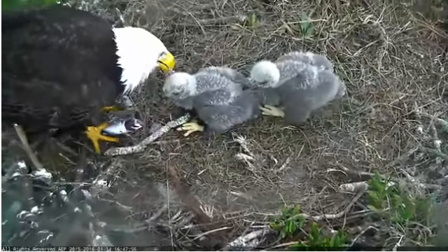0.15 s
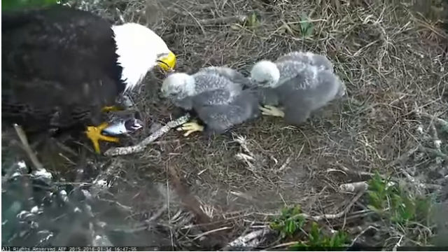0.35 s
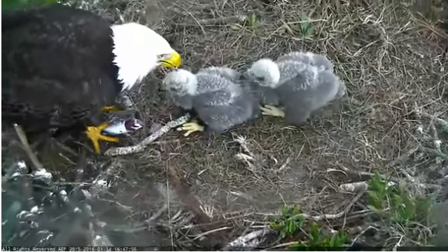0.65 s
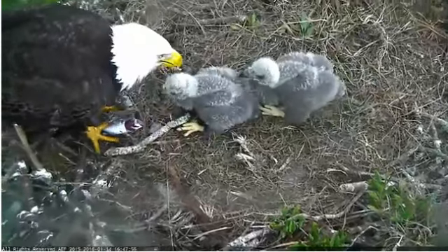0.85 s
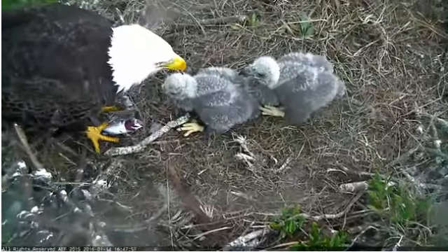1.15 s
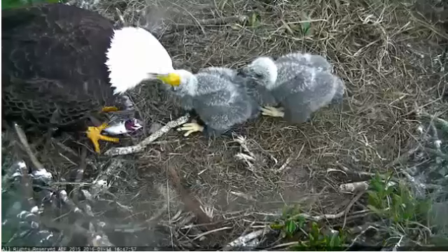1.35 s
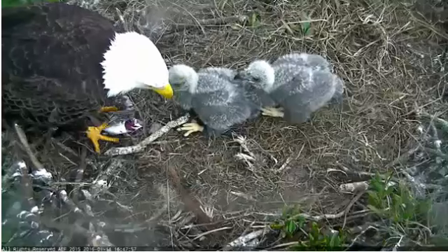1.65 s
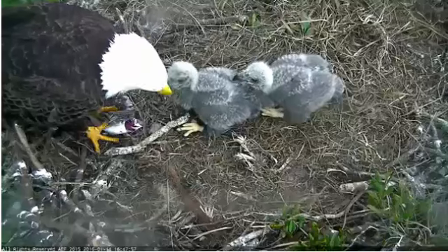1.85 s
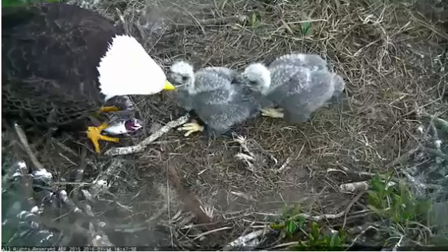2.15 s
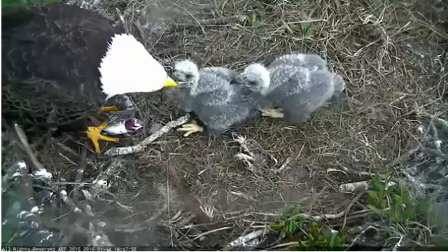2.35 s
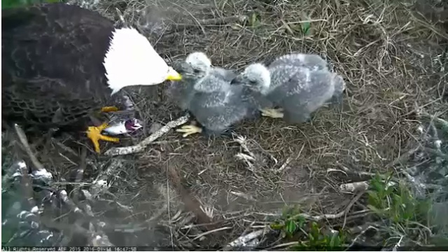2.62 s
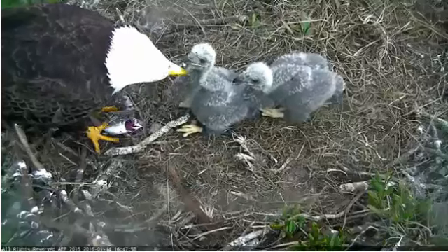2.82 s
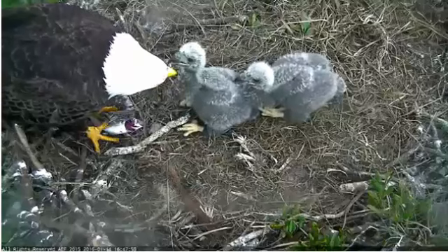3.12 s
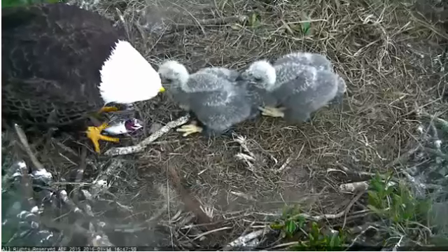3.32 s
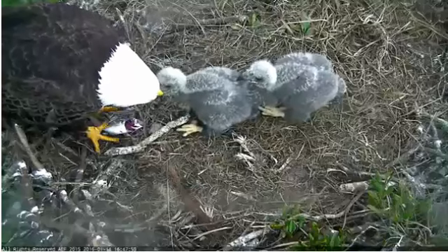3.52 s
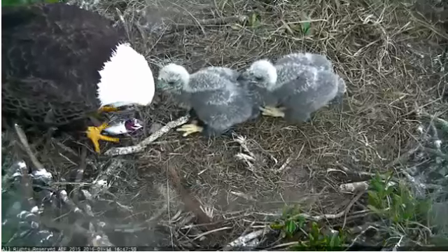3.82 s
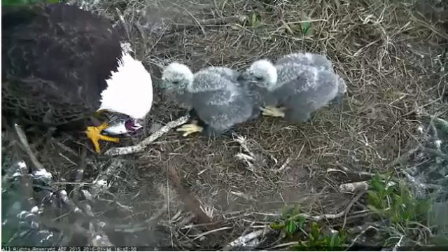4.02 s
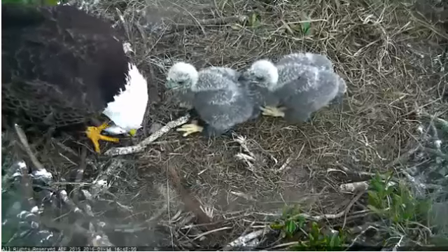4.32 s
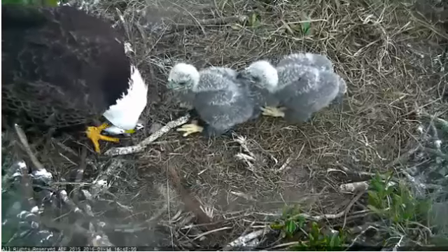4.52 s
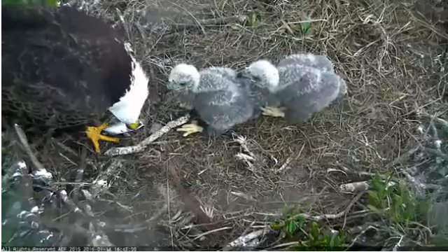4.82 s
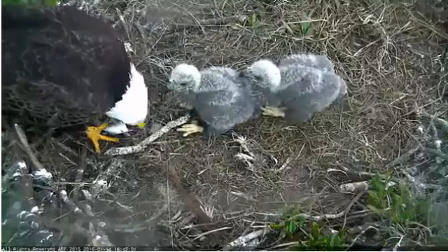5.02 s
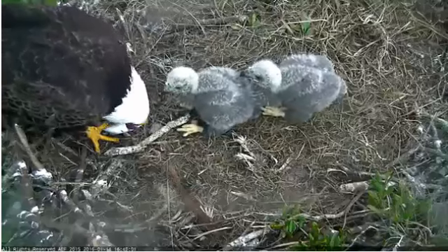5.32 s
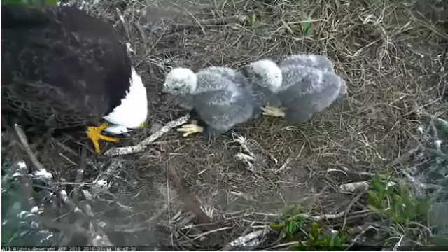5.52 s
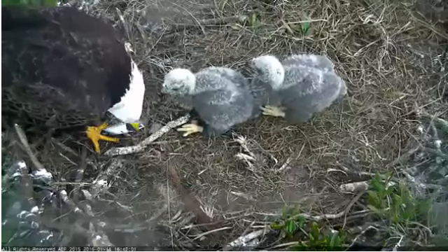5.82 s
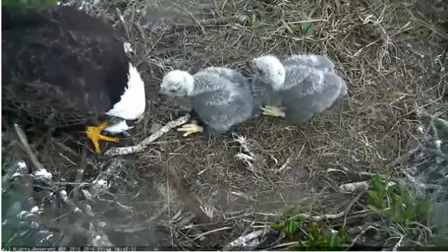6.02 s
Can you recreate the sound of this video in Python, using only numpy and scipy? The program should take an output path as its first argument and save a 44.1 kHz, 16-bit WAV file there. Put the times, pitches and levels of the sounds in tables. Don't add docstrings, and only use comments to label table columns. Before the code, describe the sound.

Close above an outdoor stick nest, one microphone picks up steady hiss, distant wind and traffic, low soft buffets and a thin electronic whine. Eaglets give faint, very short high peeps, singly and in small clusters. Past the middle, dry twig ticks and light straw drags join as the parent tears at food. At the very end a hard tug snaps twigs in a much louder crackle with a low thump.

```python
import sys
import numpy as np
from scipy import signal
from scipy.io import wavfile
from scipy.ndimage import uniform_filter1d

SR = 44100
rng = np.random.default_rng(int(sys.argv[2]) if len(sys.argv) > 2 else 0)


def decibels_to_gain(level_db):
    exponent = np.asarray(level_db, float) / 20
    return 10 ** exponent


def wav_record(signal):
    frames = np.transpose(np.atleast_2d(signal))
    bounded = np.clip(frames, -1, 1)
    quanta = np.round(bounded * 32767).astype(np.int16)
    wavfile.write(sys.argv[1], SR, quanta)


N = 271732

# frequency_hz, density_db_per_hz
AIR_SPECTRUM = [(78, -81.5), (135, -101), (215, -92), (1000, -97.5), (2100, -102), (2840, -100.5),
                (4500, -106.5), (11000, -115)]
# time_s, level_db
AIR_SWELL = [(0.1, -62), (0.67, -60.5), (0.94, -64), (1.51, -62), (1.76, -63.5), (2.33, -62.5), (2.7, -64),
             (4.54, -63.5), (6.0, -63)]
# start_s, hold_s, level_db
GUSTS = [(.54, 0.078, -60), (.81, 0.0048, -63), (1.13, .02, -66), (1.28, 0.12, -63.5), (1.7, 0.13, -66),
         (2.12, .03, -60.5), (2.52, 0.13, -71), (2.98, 0.023, -63.5), (3.19, .01, -67), (3.3, 0.06, -65),
         (3.53, 0.18, -69.5), (3.85, 0.011, -64), (4.12, 0.15, -60), (4.39, .02, -59.5), (4.59, .01, -78),
         (4.76, 0.089, -57.5), (5.1, 0.64, -83), (5.79, 0.034, -61.5)]
# pitch_hz, level_db (rms)
WHINE_LINES = [(2640, -89), (2735, -87), (2828.5, -77), (2923, -84), (3017, -88)]
# frequency_hz, density_db_per_hz
HISS_SPECTRUM = [(30, -81), (200, -108), (1000, -109.5), (4500, -110), (7000, -109), (11000, -111)]
AMPLIFIER_OFFSET = [
    [-.10014],
    [-.05794],
]
# start_s, length_s, first_pitch_hz, last_pitch_hz, peak_level_db
PEEPS = [(0.039, 0.023, 3400, 2750, -56.5), (0.371, 0.038, 3470, 2610, -54.5),
         (0.73, 0.019, 2980, 3420, -62), (0.745, 0.015, 3590, 3530, -58), (0.759, 0.018, 3440, 2780, -63),
         (1.164, 0.035, 3500, 4280, -64), (1.518, 0.017, 4100, 4450, -60), (2.282, 0.022, 3350, 2660, -63),
         (2.413, 0.013, 3980, 3050, -52), (2.428, 0.011, 3520, 4350, -63), (2.62, 0.018, 3400, 3300, -58),
         (2.638, 0.023, 3400, 2650, -60.5), (2.903, 0.02, 3830, 3980, -59), (2.93, 0.026, 3450, 2680, -56),
         (2.96, 0.011, 2850, 3250, -69), (2.976, 0.024, 3520, 2730, -55), (3.235, 0.012, 3640, 4450, -53),
         (3.288, 0.0224, 3360, 2630, -59), (3.945, 0.025, 3690, 3000, -66), (4.134, 0.031, 3770, 3610, -54),
         (4.282, 0.036, 3390, 2810, -63), (4.364, 0.029, 3005, 3910, -57), (4.718, 0.028, 3200, 2580, -65),
         (5.487, 0.051, 3010, 3850, -57.5)]
# start_s, low_ring_level_db, low_ring_pitch_hz, high_ring_level_db
TICKS = [(3.3502, -56, 2950, -67.2), (3.3964, -54.5, 3050, -63.3), (3.6251, -54, 2560, -54),
         (4.0068, -56, 3010, -68), (4.187, -52, 2420, -57), (4.2315, -62.4, 2840, -71),
         (4.2713, -67, 1960, -60), (4.318, -55, 2930, -69.7), (4.3584, -56, 3120, -68),
         (4.3662, -54, 2660, -64), (4.3717, -51, 3350, -58), (4.3784, -57, 2450, -63),
         (4.3882, -57, 2950, -57), (4.3953, -57, 2780, -55), (4.4047, -65, 2710, -62),
         (4.4474, -54, 2740, -63), (4.4548, -69, 3150, -62), (4.6325, -59, 2880, -72),
         (4.704, -65, 2800, -60), (4.7204, -61.9, 3140, -54.5), (4.8974, -53, 2650, -60),
         (4.9528, -51, 3020, -52), (5.0461, -59, 2650, -53.5), (5.5047, -53, 2630, -69)]
# start_s, low_ring_level_db, low_ring_pitch_hz, high_ring_level_db
TUG_SNAPS = [(6.061, -59, 2650, -63), (6.0648, -42, 2740, -45), (6.0655, -56, 2830, -46),
             (6.0744, -45, 2860, -54), (6.0805, -58, 2730, -68), (6.0874, -54, 2980, -48),
             (6.0919, -45, 2890, -47), (6.101, -51, 3240, -52), (6.108, -44, 2950, -48),
             (6.1125, -47, 2600, -55), (6.1165, -48, 1810, -54), (6.1215, -50, 2880, -57),
             (6.128, -53, 2860, -67), (6.133, -52, 2820, -61), (6.1453, -60.1, 2750, -65)]
# start_s, hold_s, level_db
STRAW_DRAGS = [
    (3.4, .01, -86),
    (3.62, .01, -70),
    (4.2, .05, -76),
    (4.365, 0.036, -71),
    (4.7, 0.019, -76),
    (4.95, 0.16, -75),
]
# start_s, hold_s, level_db
STRAW_TUG = [
    (6.066, 0.047, -59.5),
]
# start_s, hold_s, level_db
NEST_SHAKE = [
    (6.09, 0.021, -53),
]
# frequency_hz, common_share, difference_share
DROPOUTS = [(150, 0, .75), (1000, 0, .6), (2500, 0, .62), (4200, 0, .03), (8000, .2, .03), (9500, .55, .12),
            (10900, .85, .35)]
# time_s, lost_share
TREBLE_LOSS = [(6.058, 0), (6.062, 1), (6.083, 1), (6.086, 0)]


def evened(x):
    return x / np.sqrt(np.mean(x ** 2) + 1e-20)


def curve(rows):
    return np.interp(np.arange(N) / SR, *np.transpose(rows))


def add(mix, start_s, sound):
    part = mix[round(start_s * SR):][:len(sound)]
    part += sound[:len(part)]


def band(x, low_hz, high_hz):
    return signal.sosfilt(signal.butter(3, [low_hz, high_hz], "band", fs=SR, output="sos"), x)


def bursts(rows, rise_db_s, fall_db_s):
    start, hold, db = np.transpose(rows)[:, :, None]
    t = np.arange(N) / SR
    rise = rise_db_s * np.maximum(start - t, 0)
    fall = fall_db_s * np.maximum(t - start - hold, 0)
    return (db - rise - fall).max(axis=0)


def noise(points, patchy_db):
    frames, hz = N // 256 + 5, np.fft.rfftfreq(1024, 1 / SR)
    real, imaginary, patches = rng.standard_normal((frames, 513, 3)).T
    grains = real + 1j * imaginary
    patches = uniform_filter1d(patches, size=12, axis=0)
    patches = evened(uniform_filter1d(patches, size=14, axis=1))
    point_hz, point_db = np.transpose(points)
    level_db = np.interp(np.log(hz + 1), np.log(point_hz), point_db)[:, None]
    white = signal.istft(grains, nperseg=1024, noverlap=768)[1].std()
    shaped = signal.istft(grains * decibels_to_gain(level_db + patchy_db * patches), nperseg=1024, noverlap=768)[1]
    return shaped[:N] * np.sqrt(SR / 2) / white


def air():
    swell_db = curve(AIR_SWELL)
    far = noise(AIR_SPECTRUM, patchy_db=0.77) * decibels_to_gain(0.39 * (swell_db - swell_db.mean()))
    gust_db = np.maximum(bursts(GUSTS, rise_db_s=194, fall_db_s=285), -106)
    return far + evened(band(rng.standard_normal(N), 82.4, 179.0)) * decibels_to_gain(gust_db - 3.5)


def whine():
    t, out = np.arange(N) / SR, np.zeros(N)
    for hz, db in WHINE_LINES:
        strength, slip = uniform_filter1d(rng.standard_normal((2, N)), size=1200, axis=1)
        out += decibels_to_gain(db + 2 + 3 * evened(strength)) * np.sin(2 * np.pi * hz * t + evened(slip))
    return out


def hiss():
    return np.array([noise(HISS_SPECTRUM, patchy_db=.3), noise(HISS_SPECTRUM, patchy_db=.3)])


def peep(length_s, first_hz, last_hz, db, wobble):
    u = np.linspace(0, 1, round(length_s * SR))
    lag = 0.153
    hz = first_hz + (last_hz - first_hz) * (u - lag * 4 * u * (1 - u))
    flutter_db = 0.52 * np.interp(u, np.linspace(0, 1, len(wobble)), wobble)
    pitch_db = -5 * ((hz - 3200) / 1000) ** 2
    swell = np.sin(np.pi * u) ** .55
    return decibels_to_gain(db + flutter_db + pitch_db) * swell * np.sin(2 * np.pi * np.cumsum(hz) / SR)


def chicks():
    out = np.zeros(N)
    for (start_s, *row), wobble in zip(PEEPS, rng.standard_normal((len(PEEPS), 8))):
        add(out, start_s, peep(*row, wobble))
    add(out, .00281, decibels_to_gain(-4.5) * out.copy())
    t = np.arange(3000) / SR
    smear = evened(rng.standard_normal(len(t)) * decibels_to_gain(-60 * t / 0.14)) / np.sqrt(len(t))
    return decibels_to_gain(-2.5) * (out + decibels_to_gain(-11) * signal.oaconvolve(out, smear)[:N])


def twigs():
    out, t = np.zeros(N), np.arange(1500) / SR
    snap = band(1. * (np.arange(len(t)) == 10), 2000, 4600)
    snap /= snap.max()
    decay_and_attack = decibels_to_gain(6.5 - 60 * t / 0.0094) * (1 - np.exp(-t / 0.00032))
    rows = TICKS + TUG_SNAPS
    for (start_s, low_db, low_hz, high_db), grit in zip(rows, rng.standard_normal((len(rows), len(t)))):
        high_hz = 3615 + 280 * np.tanh(grit[0])
        ring = decibels_to_gain(low_db) * np.sin(2 * np.pi * low_hz * t)
        ring += decibels_to_gain(high_db) * np.sin(2 * np.pi * high_hz * t)
        ring += decibels_to_gain(high_db - 17) * evened(band(grit, 1800, 9000))
        add(out, start_s, ring * decay_and_attack)
        add(out, start_s, decibels_to_gain(high_db + 3.5) * snap)
    return out


def straw():
    crackle = rng.standard_normal(N) * decibels_to_gain(2.2 * rng.exponential(1, N))
    crackle *= rng.random(N) < 2500 / SR
    drag = decibels_to_gain(bursts(STRAW_DRAGS, rise_db_s=202, fall_db_s=234))
    tug = decibels_to_gain(bursts(STRAW_TUG, rise_db_s=2400, fall_db_s=400))
    rustle = evened(band(crackle, 2250, 4100)) * (drag + tug)
    shake = decibels_to_gain(bursts(NEST_SHAKE, rise_db_s=500, fall_db_s=700))
    return rustle + evened(band(rng.standard_normal(N), 77, 414)) * shake


def ragged(x):
    hz, t, z = signal.stft([x[0] + x[1], x[0] - x[1]], SR, nperseg=1024)
    dice = rng.random((2, len(hz) // 3 + 1, len(t) // 4 + 1))
    dice = dice.repeat(3, 1).repeat(4, 2)[:, :len(hz), :len(t)]
    point_hz, *shares = np.transpose(DROPOUTS)
    chance = np.array([np.interp(hz, point_hz, share) for share in shares])[:, :, None]
    kept = z * (dice > chance) / np.sqrt(1 - chance)
    mid, side = signal.istft(kept, SR, nperseg=1024)[1][:, :N]
    return np.array([mid + side, mid - side]) / 2


def scene():
    mono = air() + whine() + chicks() + twigs() + straw()
    bass_cut = signal.butter(2, 55, "high", fs=SR, output="sos")
    return np.tile(signal.sosfilt(bass_cut, mono), (2, 1))


def band_limit(x):
    return signal.sosfilt(signal.butter(12, 10860, fs=SR, output="sos"), x)


def record(dry):
    wet = ragged(dry + hiss())
    above_5200_hz = signal.firwin(201, 5200, pass_zero=False, fs=SR)[None]
    treble = signal.oaconvolve(wet, above_5200_hz, "same")
    mix = wet - curve(TREBLE_LOSS) * treble + np.array(AMPLIFIER_OFFSET)
    return band_limit(mix)


dry = scene()
out = record(dry)
wav_record(out)
```